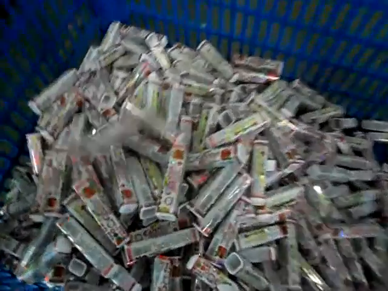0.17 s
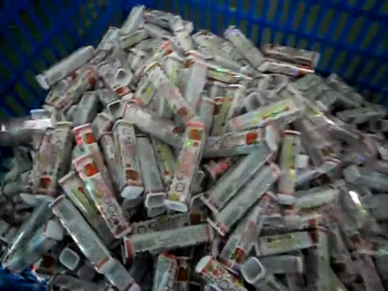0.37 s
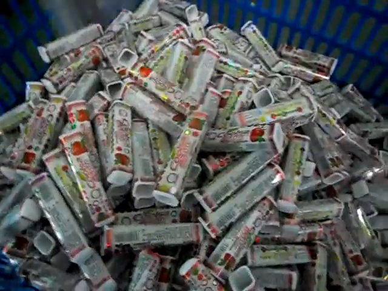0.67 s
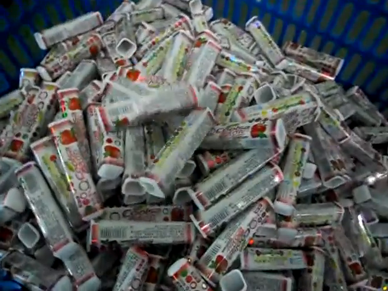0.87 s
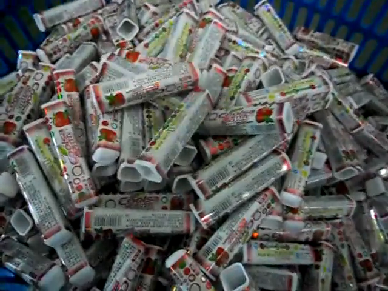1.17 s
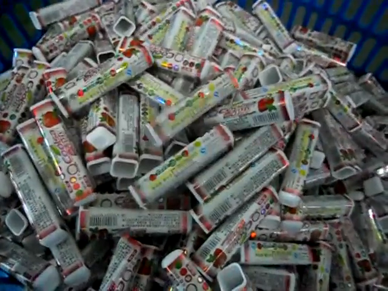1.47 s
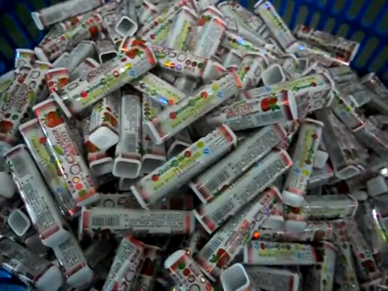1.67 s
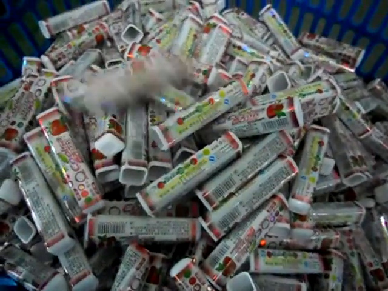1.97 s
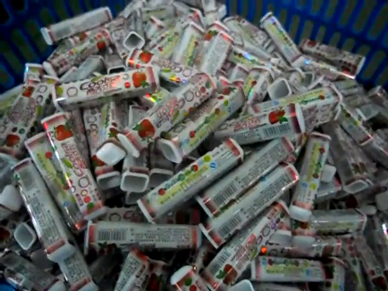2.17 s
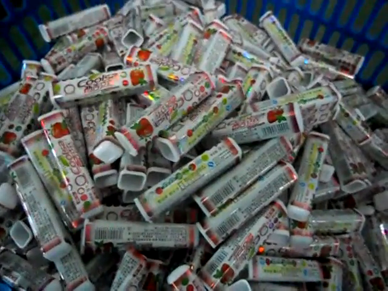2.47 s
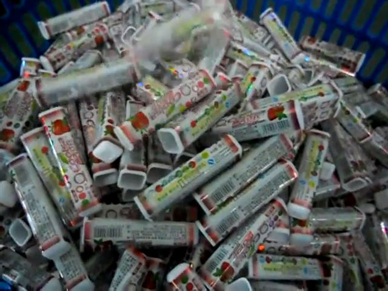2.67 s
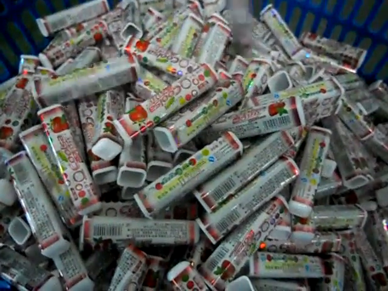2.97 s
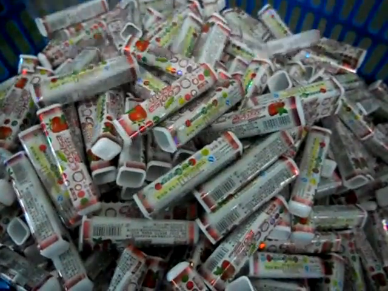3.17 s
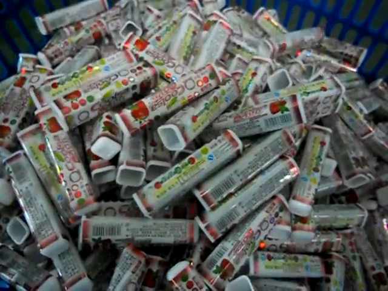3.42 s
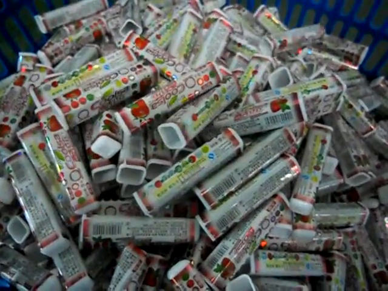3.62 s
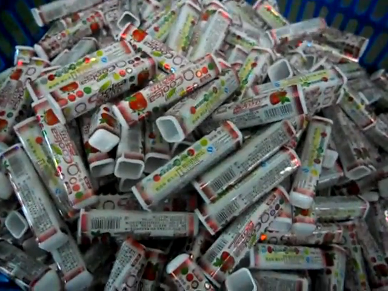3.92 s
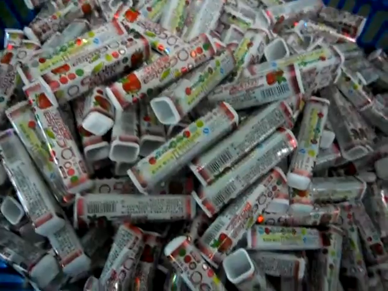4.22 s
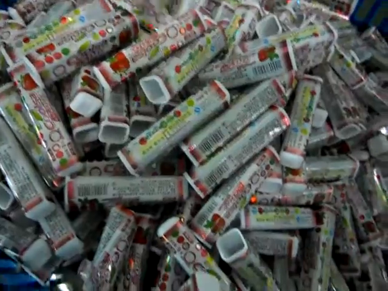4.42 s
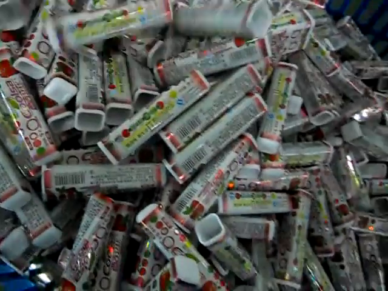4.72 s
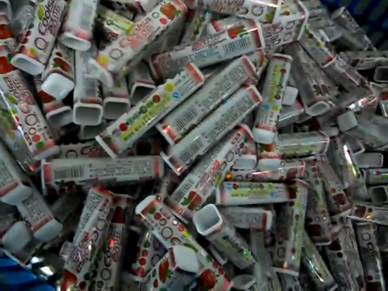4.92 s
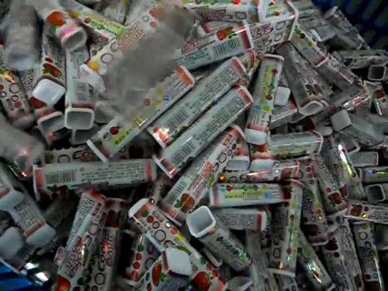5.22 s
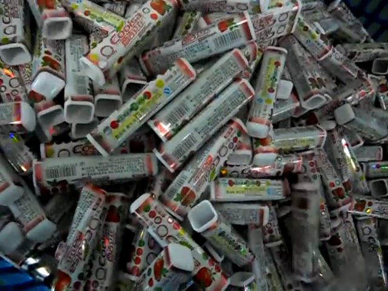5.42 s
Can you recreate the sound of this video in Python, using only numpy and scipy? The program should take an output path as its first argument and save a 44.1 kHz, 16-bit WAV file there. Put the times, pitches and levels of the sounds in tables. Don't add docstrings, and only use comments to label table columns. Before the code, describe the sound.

In a noisy workshop, a close cheap camera microphone hears empty plastic tubes landing sharply on a heap, singly at first, then crowding into a rattling tumble after four seconds. A throbbing motor hum, airy hiss and roar continue throughout, pumping up in calm moments and dropping at strong impacts. Dull machine strokes with short metallic rings come from farther away, mostly just before two and around four seconds.

```python
import sys
import numpy as np
from scipy import signal
from scipy.fft import rfft, irfft
from scipy.io import wavfile
from scipy.ndimage import uniform_filter1d, minimum_filter1d

SR = 44100
rng = np.random.default_rng(int(sys.argv[2]) if len(sys.argv) > 2 else 0)


def level_to_linear(level):
    exponent = np.asarray(level, float) / 20
    return 10 ** exponent


def unload_wav(signal):
    wavfile.write(
        sys.argv[1],
        SR,
        np.round(np.clip(np.atleast_2d(signal).T, -1, 1) * 32767).astype(np.int16),
    )


N = 246519

# (time [s], gain [dB])
CAMERA_GAIN = [(0, 20), (0.084, 12.5), (.088, 2), (0.559, 5), (.76, -1), (1.05, 1), (1.3, 3.5), (1.599, 14),
               (1.851, 20), (1.887, 18), (1.895, -2), (2.93, -3), (3.29, 1.5), (3.56, 16.5), (4.3, 23.5),
               (4.412, 8.5), (4.749, 3.5), (5.59, 4.5)]
# (multiple of mains, level [dB])
MAINS_ORDERS = [(1, 1), (2, -12.5), (3, -18)]
# (multiple of rotor speed, level [dB])
ROTOR_ORDERS = [(1, -3.5), (2, -1), (4, -9)]
# (frequency [Hz], level [dB])
FAN_TONES = [(138.15, -11.5), (185, -16)]
# (frequency [Hz], density [dB per Hz])
RUMBLE_SPECTRUM = [(20, -6), (35, -12), (90, -6), (180, -9), (300, -22.5), (500, -36)]
# (frequency [Hz], density [dB per Hz])
ROAR_SPECTRUM = [(120, -34), (210, -8), (324, -1.5), (361, -7), (627, -7), (814, -5), (1340, -5.5),
                 (1430, -13), (1940, -15.5), (2800, -21), (3640, -48), (6160, -120)]
# (frequency [Hz], density [dB per Hz])
HISS_SPECTRUM = [(880, -34.5), (1500, -3.5), (1600, -0.5), (1940, -15.5), (2650, -7.5), (3070, -8.5),
                 (4200, -5.5), (5740, -9.5), (6780, -8), (7900, -12.5), (10300, -70), (17400, -120)]
# (time [s], level [dB], ring pitch [Hz], ring level re stroke [dB], hall decay t60 [s])
STROKES = [(1.564, -20.5, 708, 1, 0.25), (1.752, -17, 729, -5, 0.55), (1.79, -8, 1140, 1, 0.53),
           (1.833, -4.5, 1120, -18, 0.12), (3.518, -38, 1340, -3.5, 0.022), (3.582, -9.5, 1140, -3.5, 0.27),
           (3.632, -7.5, 894, -27, 0.23), (3.76, -18.5, 776, -16, 0.66), (3.902, -9.5, 1290, -9, 0.074),
           (3.958, -19.5, 589, 9, 0.076), (4.159, -17, 743, -2, 0.098), (4.208, -11, 1260, -3, 0.23),
           (4.297, -5, 1090, -7, 0.21)]
# (time [s], pitch [Hz], level [dB], time to die [s])
CLANKS = [
    (1.832, 5365, -19, .075),
    (3.865, 1315, -19, .2),
    (3.885, 1575, -23, .1),
    (4.225, 1260, -19, .17),
    (4.225, 1130, -20, .11),
    (4.145, 193, -21, .16),
    (3.95, 190, -24, .14),
    (1.425, 1230, -33, .14),
    (3.47, 890, -32, .13),
    (4.475, 1035, -30, .13),
]
# (frequency [Hz], level [dB])
WALL_MODES = [(2100, -14), (2800, -8.5), (3700, -5.5), (4600, 2.5), (5900, -1), (7000, 4.5), (7900, 3)]
# (frequency [Hz], level [dB])
HOLLOW_MODES = [(450, -7), (660, 2.5), (1500, -11.5)]
# (time [s], blow [dB], hollow knock re blow
# [dB], wall pitch [Hz], rattle t60 [s])
LANDINGS = [(0.0716, -0.5, -13, 4335, 0.046), (0.2947, -15.5, -19, 1980, 0.029),
            (0.6491, 1, -12, 7200, 0.031), (1.1599, -6, -8, 1800, 0.023), (1.8796, 2.5, -23, 4700, 0.0065),
            (2.489, -9, -10.5, 5100, 0.024), (2.6368, -21.5, -6, 4180, 0.04),
            (3.0792, -18, -29, 3630, 0.018), (3.1239, -5.5, -10.5, 7200, 0.039),
            (4.3501, -5, -3, 4890, 0.025), (4.4216, -3.5, -10.5, 5000, .017),
            (4.4608, -0.5, -11, 7740, 0.044), (4.572, -20.5, -2, 2900, 0.022),
            (4.638, -29, -15, 3950, 0.017), (5.3846, -23, -15, 4600, 0.018),
            (4.6009, -18.5, 0.5, 4160, 0.045), (4.7184, -6, -18.5, 4240, 0.015),
            (5.0645, -3, -7.5, 7400, 0.047), (5.1915, -10, -25, 4280, 0.0097),
            (5.226, -17, -14, 6370, .027), (5.2948, -10, -43, 3460, 0.016), (5.3763, -18.5, -8, 7240, 0.02),
            (5.5766, -20, -3.5, 3900, 0.061)]
# (time [s], blow [dB], hollow knock re blow [dB], wall pitch [Hz])
BOUNCES = [(0.2156, -19, -22, 4400), (0.335, -29, -22, 3010), (0.7087, -27, -20, 4300),
           (0.7351, -26, -2.5, 3160), (1.203, -20, -7.5, 5870), (1.2223, -24, -16, 5060),
           (1.254, -20.5, -13, 4170), (1.294, -28, -24, 4870), (1.919, -20, -10, 6130),
           (1.928, -25, -14, 4580), (1.947, -25, -17, 4450), (1.9844, -24.5, -20, 6600),
           (2.81, -36.5, -28.5, 5060), (2.8884, -28.5, -6, 4000), (3.2108, -39, -7, 4700),
           (4.4432, -14, -9, 3600), (4.5047, -30, 1, 4520), (4.5338, -18, -28, 7340),
           (4.5468, -21, -11, 5040), (4.582, -20, -30, 4200), (4.627, -23, -9, 4360),
           (4.6727, -20.5, -16, 4100), (5.0987, -19, -13, 4120), (5.1456, -17, -21, 4350),
           (5.2335, -29, 1, 3800), (5.263, -32, -10.5, 3530), (5.3105, -37, -10, 4700),
           (5.326, -25, -4.5, 4900), (5.4083, -23, -3, 4300), (5.441, -22.5, -9, 7960)]
# (time [s], blow [dB], hollow knock re blow [dB])
SLIDES = [(0.4714, -27, 1.5), (0.5183, -23, -19), (1.111, -30, 1.5), (1.317, -22.5, -5), (1.332, -43.5, 18),
          (1.4195, -40, 11), (2.411, -31.5, 3), (2.4581, -28.5, -3), (2.9617, -31.5, 0.5),
          (3.0241, -27.5, -19), (3.295, -35.5, 0.5), (4.736, -24.5, -0.7), (5.015, -26.5, -32),
          (5.0568, -24.5, 4), (5.111, -18, -13.5), (5.1576, -23.5, -1.5), (5.3671, -30, -8),
          (5.465, -45, -1.5), (5.5259, -23, 0)]

MAINS_HZ, ROTOR_HZ, OPPOSED_S = 50, 48.27, 2.82
HUM_DB, HUM_FOLLOWS = -43, 0.66
ROAR_DB, ROAR_FOLLOWS = -44.5, 1.0
HISS_DB, HISS_FOLLOWS = -52.5, 1.134
SETTLE_DB, SETTLE_S, SETTLE_FOLLOWS = 5, 0.043, 0.54
AXIAL_HZ, AXIAL_WIDTH_HZ = 1035, 14
WALL_HZ, HOLLOW_HZ, WALL_SPREAD, HOLLOW_SPREAD = 4700, 1080, 0.12, 0.16
BOUNCE_T60, SLIDE_T60 = 0.017, 0.087
EDGE_HZ = 8117


def evened(x):
    return x / np.sqrt(np.mean(x ** 2) + 1e-20)


def add(mix, s, sound):
    part = mix[round(s * SR):][:len(sound)]
    part += sound[:len(part)]


def curve(db, follows):
    return level_to_linear(db + follows * np.interp(np.arange(N) / SR, *np.transpose(CAMERA_GAIN)))


def ring(x, hz, width):
    r = np.exp(-np.pi * width / SR)
    w = 2 * np.pi * hz / SR
    return signal.lfilter([np.sin(w)], [1, -2 * r * np.cos(w), r * r], x)


def noise(spectrum, patchy_db, flicker_db):
    frames, hz = N // 128 + 5, np.fft.rfftfreq(512, 1 / SR)
    real, imag, patches = rng.standard_normal((frames, 257, 3)).T
    patches = evened(uniform_filter1d(uniform_filter1d(patches, 5, 0), 20, 1))
    flicker = evened(uniform_filter1d(rng.standard_normal(frames), 4))
    f, db = np.transpose(spectrum)
    shape_db = np.interp(np.log(hz + 1), np.log(f + 1), db)[:, None]
    z = (real + 1j * imag) * level_to_linear(shape_db + patchy_db * patches + flicker_db * flicker)
    return evened(signal.istft(z, nperseg=512, noverlap=384)[1][:N])


def motor():
    t = 2 * np.pi * (np.arange(N) / SR - OPPOSED_S)
    mains = sum(level_to_linear(db) * np.cos(k * MAINS_HZ * t) for k, db in MAINS_ORDERS)
    rotor = sum(level_to_linear(db) * np.cos(k * (ROTOR_HZ * t + np.pi)) for k, db in ROTOR_ORDERS)
    fan = sum(level_to_linear(db) * np.cos(hz * t) for hz, db in FAN_TONES)
    f, db = np.transpose(RUMBLE_SPECTRUM)
    hz = np.fft.rfftfreq(N, 1 / SR)
    shape = level_to_linear(np.interp(np.log(hz + 1), np.log(f), db))
    rumble = irfft(rfft(rng.standard_normal(N)) * shape, N)
    return curve(HUM_DB, HUM_FOLLOWS) * (mains + rotor + fan + level_to_linear(-2.0) * evened(rumble))


def settling():
    touches = np.zeros(N)
    for s, db, *_ in LANDINGS + BOUNCES + SLIDES:
        touches[round(s * SR)] = level_to_linear(SETTLE_FOLLOWS * (db + 32.5))
    fade = np.exp(-np.arange(SR // 2) / SR / SETTLE_S)
    return np.tanh(signal.oaconvolve(touches, fade)[:N])


def workshop():
    heights = level_to_linear(1.5 * np.minimum(rng.exponential(1, N), 4))
    ticks = (rng.random(N) < 150 / SR) * heights
    scatter = rng.standard_normal(500) * level_to_linear(-60 * np.arange(500) / SR / 0.036)
    rattle = evened(np.diff(signal.oaconvolve(ticks, scatter)[:N], prepend=0))
    roar = noise(ROAR_SPECTRUM, patchy_db=0.9, flicker_db=1.3)
    hiss = noise(HISS_SPECTRUM, patchy_db=1.94, flicker_db=1.5) + level_to_linear(-4.5) * rattle
    hiss_level = curve(HISS_DB, HISS_FOLLOWS) * level_to_linear(SETTLE_DB * settling())
    return curve(ROAR_DB, ROAR_FOLLOWS) * roar + hiss_level * hiss


def strokes():
    out, t = np.zeros(N), np.arange(SR // 2) / SR
    gain = np.pad(curve(0, 0.52), (0, SR), "edge")
    bursts = rng.standard_normal((len(STROKES), len(t)))
    for (s, db, hz, ring_db, t60), burst in zip(STROKES, bursts):
        thud = level_to_linear(ring_db + 6.5 - 60 * t / 0.032) * evened(ring(burst, hz, 280))
        hall = level_to_linear(-60 * t / t60) * (burst + level_to_linear(-15) * evened(ring(burst, hz, 1200)))
        ducked = gain[round(s * SR):][:len(t)]
        level = level_to_linear(db - 6.5) * np.minimum(ducked / ducked[0], 1)
        add(out, s, level * (thud + hall) * np.minimum(t / 0.0021, 1))
    return out


def clanks():
    out, t = np.zeros(N), np.arange(SR // 2) / SR
    shakes = rng.standard_normal((len(CLANKS), len(t)))
    for (s, hz, db, t60), shake in zip(CLANKS, shakes):
        tone = np.sin(2 * np.pi * hz * t) + 0.3 * evened(ring(shake, hz, 25))
        add(out, s, level_to_linear(db - 60 * (t / t60) ** 2) * tone * np.minimum(t / 0.012, 1))
    return out


def tube(blow_db, knock_db, wall_hz, t60, hollow_hz, detune, jolt):
    t = np.arange(len(jolt)) / SR
    contacts = jolt * abs(jolt) * level_to_linear(-60 * t / max(t60, 0.004)) * np.minimum(t / 0.001, 1)
    contacts[8] += level_to_linear(21)

    def damped(hz):
        return ring(contacts, hz, hz / 4.5)

    walls = level_to_linear(-0.5) * ring(contacts, wall_hz, 700)
    for k, (hz, db) in enumerate(WALL_MODES):
        walls = walls + (-1) ** k * level_to_linear(db) * damped(hz * detune[k])
    air = damped(hollow_hz) + level_to_linear(-17) * ring(contacts, AXIAL_HZ, AXIAL_WIDTH_HZ)
    for k, (hz, db) in enumerate(HOLLOW_MODES):
        air = air + (-1) ** k * level_to_linear(db) * damped(hz)
    air = np.diff(air, prepend=0)
    return level_to_linear(blow_db) * (walls / abs(walls).max() + level_to_linear(knock_db) * air / abs(air).max())


def heap():
    out = np.zeros(N)
    for rows, common_t60 in ((LANDINGS, None), (BOUNCES, BOUNCE_T60), (SLIDES, SLIDE_T60)):
        for s, blow_db, knock_db, *own in rows:
            wall_hz = own[0] if own else WALL_HZ * np.exp(WALL_SPREAD * rng.standard_normal())
            t60 = common_t60 or own[1]
            hollow_hz = HOLLOW_HZ * np.exp(HOLLOW_SPREAD * rng.standard_normal())
            detune = 1 + 0.03 * rng.standard_normal(8)
            jolt = rng.standard_normal(4992)
            add(out, s, tube(blow_db, knock_db, wall_hz, t60, hollow_hz, detune, jolt))
    return out


def scene():
    return (motor() + workshop() + strokes() + clanks() + heap())[None]


def starved(x):
    hz, t, z = signal.stft(x, SR, nperseg=512)
    band = (hz / 520).astype(int)
    group = (np.arange(len(t)) + 1) // 8
    power = np.mean(abs(z[(hz > 2000) & (hz < 8000)]) ** 2, 0)
    loudest = np.maximum.reduceat(power, np.flatnonzero(np.diff(group, prepend=-1)))
    scatter_db = 4 * rng.standard_normal((band.max() + 1, len(loudest)))
    tilt_db = -9 * np.clip(1 - hz / 4500, 0, 1)[:, None] - 40 * (hz < 1300)[:, None]
    step_db = -15.0 + scatter_db[band][:, group] + tilt_db
    step = np.sqrt(loudest[group] + 1e-16) * level_to_linear(step_db)
    usual = uniform_filter1d(np.log(power + 1e-16), size=24)
    restless = np.log(loudest[group] + 1e-16) - usual > 0.45
    patches = rng.standard_normal((len(t) // 2 + 1, band.max() * 2 + 2)).T
    patch_db = 3.5 * patches[(hz / 260).astype(int)][:, np.arange(len(t)) // 2]
    floor_db = 3.5 + patch_db + tilt_db - 20 * (hz > 7700)[:, None]
    step = np.maximum(step, restless * np.exp(usual / 2) * level_to_linear(floor_db))
    z = z + abs(z) * level_to_linear(-10) * np.exp(2j * np.pi * rng.random(z.shape))
    z = step * (np.round(z.real / step) + 1j * np.round(z.imag / step))
    return signal.istft(z, SR, nperseg=512)[1][:N]


def thinned(x):
    hz, t, z = signal.stft(x, SR, nperseg=4096)
    power = uniform_filter1d(abs(z) ** 2, size=2, axis=1) + 1e-16
    nearby = uniform_filter1d(power, size=5, axis=0)
    weak = nearby < 0.45 * uniform_filter1d(power, size=60, axis=0)
    bright = uniform_filter1d(np.diff(x, prepend=0) ** 2, size=256)
    loudest = -minimum_filter1d(-bright, size=4096)
    peak = loudest / (uniform_filter1d(bright, size=4096) + 1e-14)
    calm = peak[np.minimum((t * SR).astype(int), N - 1)] < 3.5
    dropped = weak & calm & (hz > 2200)[:, None]
    return signal.istft(z * ~dropped, SR, nperseg=4096)[1][:N]


def low_pass(x):
    return signal.sosfilt(signal.butter(12, 9250, fs=SR, output="sos"), x)


def record(dry):
    edge = signal.firwin(201, EDGE_HZ, window=("kaiser", 8), fs=SR)
    x = 1.8 * np.tanh(signal.oaconvolve(dry[0], edge, "same") / 1.8)
    x = signal.oaconvolve(thinned(starved(x)), edge, "same")
    return low_pass(np.clip(x, -1, 1)[None])


dry = scene()
out = record(dry)
unload_wav(out)
```